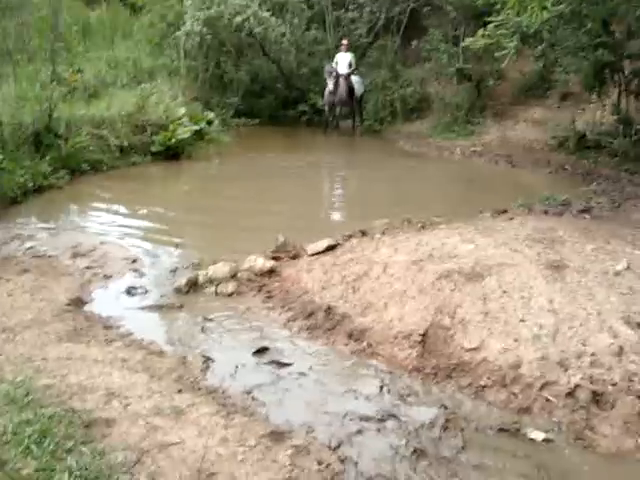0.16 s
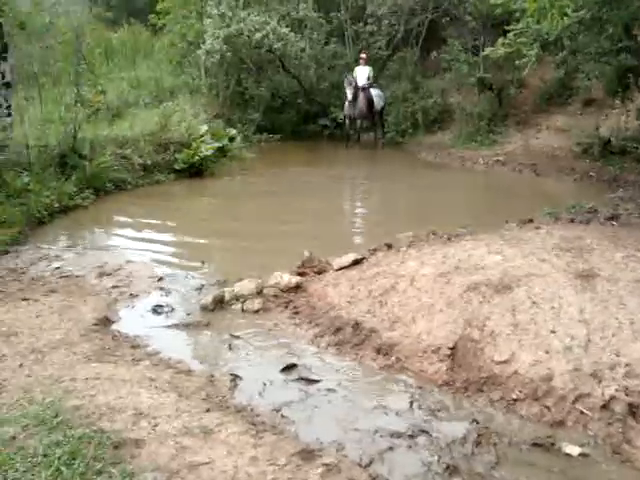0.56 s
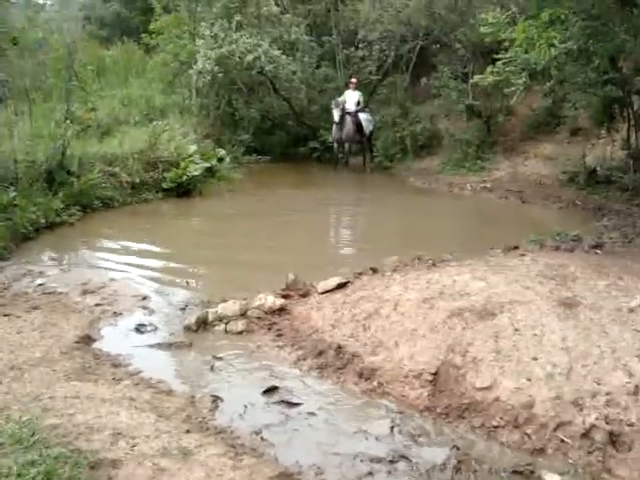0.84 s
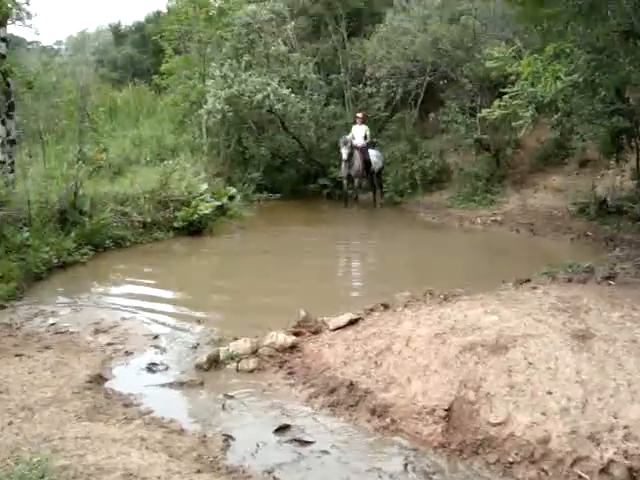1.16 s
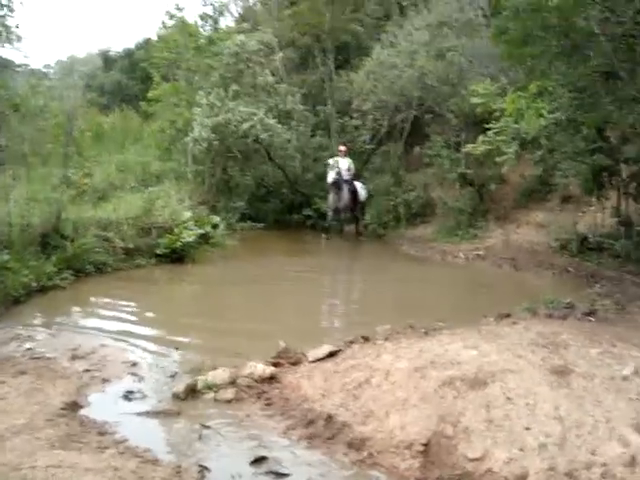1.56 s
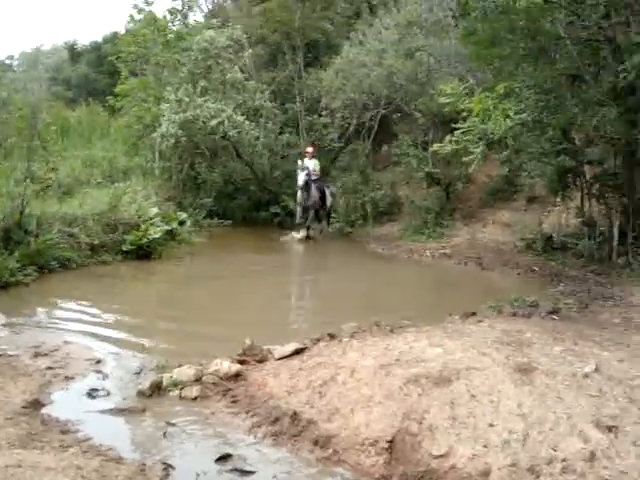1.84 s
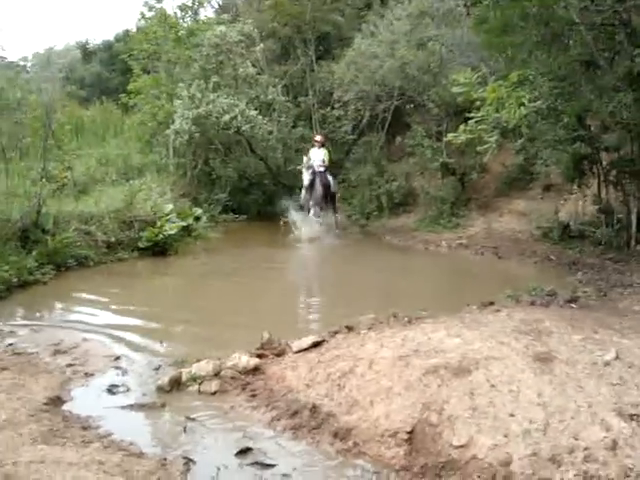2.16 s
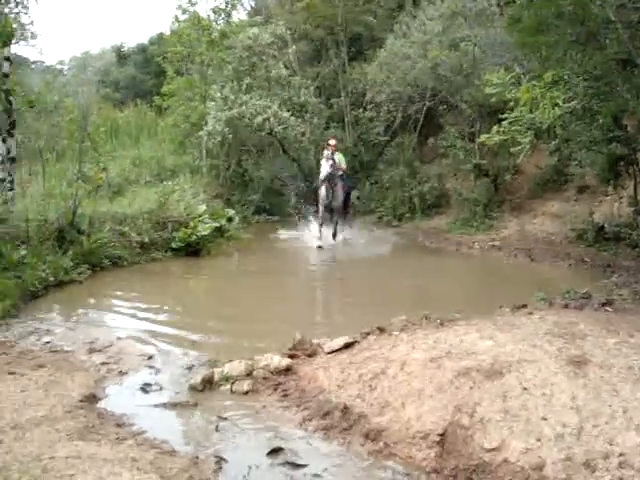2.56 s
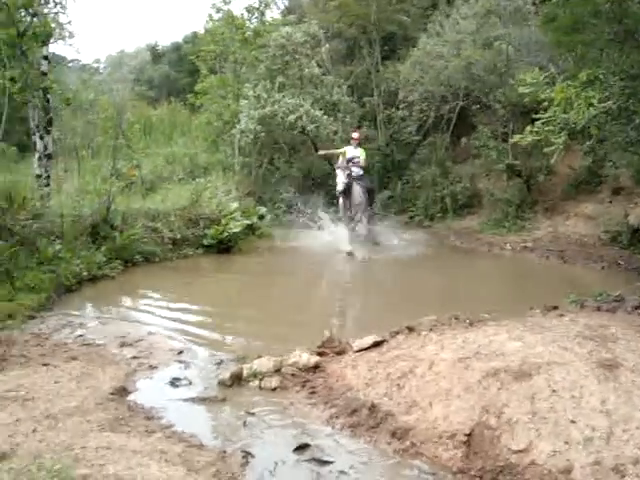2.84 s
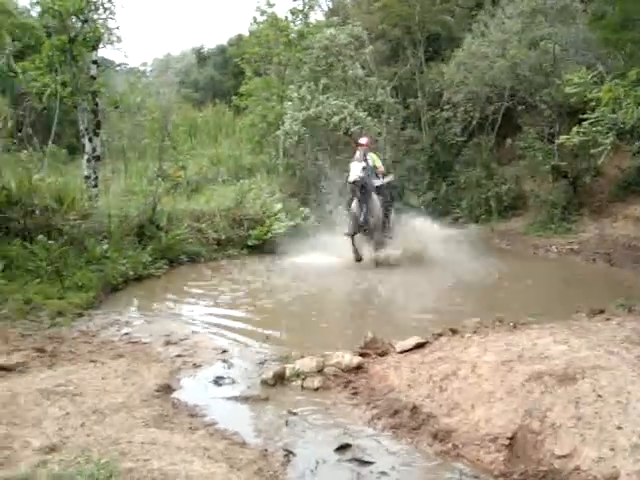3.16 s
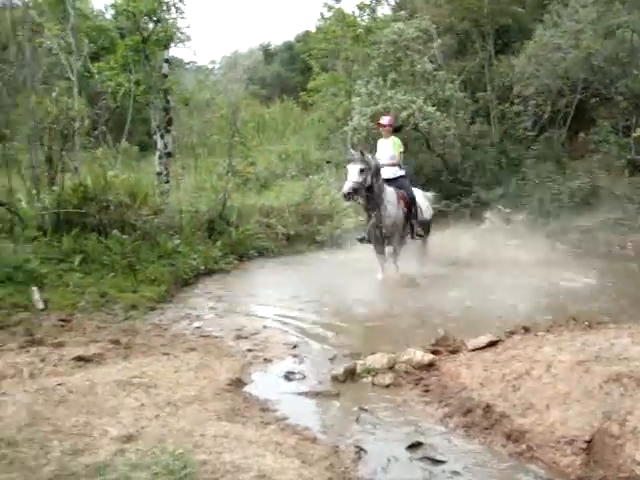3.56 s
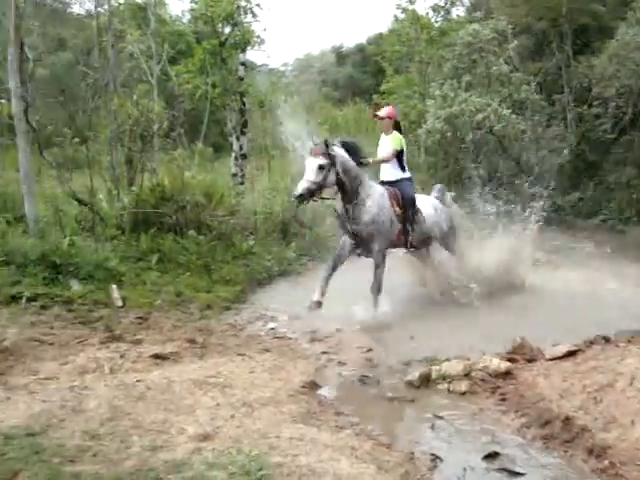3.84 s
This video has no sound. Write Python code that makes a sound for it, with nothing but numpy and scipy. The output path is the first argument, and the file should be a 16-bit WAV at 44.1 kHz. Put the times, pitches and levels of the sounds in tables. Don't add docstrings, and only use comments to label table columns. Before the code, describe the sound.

Hooves plunge and crack into shallow water, growing nearer, after a quiet moment of thin insect song

```python
import sys
import numpy as np
from scipy import signal
from scipy.io import wavfile
from scipy.ndimage import uniform_filter1d

SR = 44100
rng = np.random.default_rng(int(sys.argv[2]) if len(sys.argv) > 2 else 0)


def master(y):
    cut = np.clip(np.atleast_2d(y).T, -1, 1)
    pcm = np.round(cut * 32767)
    wavfile.write(sys.argv[1], SR, pcm.astype(np.int16))


def boost_factor(decibels):
    exponent = np.asarray(decibels, float) / 20
    return 10 ** exponent


N = 176400
TIME_S = np.arange(N) / SR
BINS_HZ = np.fft.rfftfreq(4096, 1 / SR)


def evened(x):
    return x / np.sqrt(np.mean(x ** 2) + 1e-20)


def read(points, hz):
    f, value = np.transpose(points)
    return np.interp(np.log(hz + 1), np.log(f + 1), value)


def add(mix, s, sound):
    part = mix[round(s * SR):][:len(sound)]
    part += sound[:len(part)]


def slow(rate_hz):
    t = np.arange(0, N + 256, 256) / SR
    wave = 0
    for f in np.geomspace(rate_hz / 20, rate_hz, 20):
        wave = wave + np.sin(2 * np.pi * (f * t + rng.random())) / np.sqrt(f)
    return np.interp(TIME_S, t, evened(wave))


def coloured(x, db):
    full = np.log(boost_factor(np.concatenate([db, db[-2:0:-1]])))
    taps = np.fft.ifft(np.exp(full - 1j * signal.hilbert(full).imag)).real[:2048]
    return signal.oaconvolve(x, taps)[:len(x)]


def water_db(hz):
    # f/Hz, level/dB
    low_colour = [(25, -53), (110, -15.5), (220, 1), (380, -1.5), (575, 4), (750, -3), (1000, 2.5),
                  (1250, 0)]
    high_colour = [(1700, -2.5), (2290, -6), (3100, -1.5), (3600, -2.5), (5500, -9.5), (9400, -15),
                   (10000, -18)]
    return read(low_colour + high_colour, hz)


def stir(hz, t):
    # t/s, level/dB
    spray = [(1.4, -56), (1.68, -49.5), (1.84, -44.5), (1.87, -36.5), (2.1, -35), (2.5, -33), (2.75, -31.5),
             (3.05, -28), (3.3, -28), (3.46, -27), (3.6, -23), (3.85, -29.5), (4.0, -23.5)]
    # t/s, level/dB, f/Hz, length/s
    plunges = [(1.523, -22.5, 780, 0.021), (1.687, -23.5, 950, 0.079), (1.722, -21, 900, 0.047),
               (1.76, -20.5, 480, 0.012), (1.853, -20, 1210, 0.048), (1.903, -13.5, 1460, 0.014),
               (1.933, -4, 6200, 0.036), (2.044, -16.5, 1100, 0.16), (2.174, -18, 1080, 0.065),
               (2.279, -12.5, 1160, 0.089), (2.334, -9, 790, 0.028), (2.524, -9, 550, 0.02),
               (2.582, -5.5, 1120, 0.044), (2.71, -5, 683, 0.022), (2.812, -8, 1230, 0.032),
               (2.91, -13, 610, 0.025), (2.945, -10.5, 1120, 0.083), (3.017, -15, 1100, 0.036),
               (3.1, -1.5, 970, 0.041), (3.16, -4.5, 1170, 0.027), (3.207, -2.5, 1150, 0.014),
               (3.219, -4, 406, 0.028), (3.36, -15, 1080, 0.018), (3.398, -8.5, 493, 0.037),
               (3.485, 1.5, 690, 0.0086), (3.502, 0, 1040, 0.021), (3.605, -0.5, 1630, 0.029),
               (3.625, -5.5, 700, 0.12), (3.691, -0.5, 900, 0.019), (3.888, 0, 1070, 0.0085),
               (3.948, -4, 1100, 0.065)]
    # t/s, level/dB, length/s
    fizzes = [(1.85, -28.5, 0.014), (1.934, -16.5, 0.015), (2.034, -29, 0.098), (2.333, -27.5, 0.14),
              (2.53, -21.5, 0.097), (2.676, -9.5, 0.014), (2.71, -23, 0.077), (2.809, -17, 0.0055),
              (2.816, -17, 0.012), (2.908, -24.5, 0.03), (3.04, -24.5, 0.13), (3.096, -17.5, 0.26),
              (3.171, -18.5, 0.033), (3.205, -16.5, 0.02), (3.255, -12.5, 0.0068), (3.346, -17, 0.0049),
              (3.509, -12.5, 0.05), (3.625, -16, 0.27), (3.644, -19, 0.037), (3.678, -14.5, 0.11),
              (3.876, -17, 0.066)]
    plunge_db, plunge_octaves, plunge_rise_s = -15, 0.74, 0.0016
    fizz_db, fizz_hz, fizz_octaves, fizz_rise_s = -3, 2330, 0.86, 0.00038

    spray_db = np.interp(t, *np.transpose(spray), left=-99)
    bass_share = 1 / (1 + (hz / 253) ** 2)
    power = boost_factor(spray_db + np.outer(bass_share, spray_db - spray[-1][1])) ** 2
    for s, db, pitch_hz, length in plunges:
        u = np.maximum(t - s, 0)
        band = np.exp(-(np.log2(hz / pitch_hz) / plunge_octaves) ** 2)
        swell = (1 - np.exp(-u / plunge_rise_s)) * np.exp(-u / length)
        power = power + boost_factor(2 * (db + plunge_db)) * np.outer(band, swell)
    high = 1 / (1 + np.exp(-np.log2(hz / fizz_hz) / fizz_octaves))
    for s, db, length in fizzes:
        u = np.maximum(t - s, 0)
        swell = (1 - np.exp(-u / fizz_rise_s)) * np.exp(-u / length)
        power = power + boost_factor(2 * (db + fizz_db)) * np.outer(high, swell)
    return power


def water():
    drops_per_s, spread_db = 8000, 3.2
    cycles, glide = 4.9, .05
    wash = 0.47
    pitches_hz, t = np.geomspace(40, 11000, num=40), np.arange(0, N + 64, 64) / SR
    share = pitches_hz / pitches_hz.sum()
    gain = np.sqrt(stir(pitches_hz, t))
    out = np.zeros(N)
    for hz, part, level in zip(pitches_hz, share, gain):
        chance = (drops_per_s * part + 40) / SR
        sizes = boost_factor(spread_db * np.minimum(rng.exponential(1, N), 5))
        drops = sizes * (rng.random(N) < chance)
        drive = np.sqrt(1 - wash) * evened(drops) + np.sqrt(wash) * rng.standard_normal(N)
        drive = drive * np.interp(TIME_S, t, level)
        u = np.arange(0, 3 * cycles, hz / SR)
        bubble = u * np.exp(-2 * u / cycles) * np.sin(2 * np.pi * u * (1 + glide * u / cycles))
        bubble = bubble / np.linalg.norm(bubble)
        out += signal.oaconvolve(drive, bubble)[:N] * np.sqrt(part)
    db = water_db(BINS_HZ)
    return coloured(out, db) / np.sqrt(2 * np.mean(boost_factor(2 * db)))


def slaps():
    # t/s, peak level/dB, length/s, f/Hz
    cracks = [(1.517, -37, .002, 950), (1.904, -25, .002, 1600), (1.9333, -8, .004, 4500),
              (2.677, -6, .004, 3200), (2.704, -16, .002, 3300), (2.8017, -6, .0012, 4000),
              (2.833, -12, .002, 3000), (3.028, -15, .002, 3300), (3.118, -13, .003, 1050),
              (3.2135, -11, .003, 3080), (3.2592, -9, .0013, 3400), (3.342, -13, .006, 1400),
              (3.5022, -3.5, .004, 3400), (3.621, -6, .003, 2100), (3.644, -12, .002, 1900),
              (2.0222, -22, .003, 3130), (2.4602, -23, .002, 3500), (2.9007, -18, .002, 3660),
              (3.3477, -13, .002, 3030), (3.4838, -14, .002, 3360), (3.829, -12, .0012, 3800),
              (3.8905, -7.5, .004, 2800)]
    # t/s, level/dB, length/s
    thuds = [
        (1.9345, -24, .0005),
        (2.679, -38, .001),
        (3.262, -39, .0013),
        (3.504, -35, .0013),
        (3.625, -40, .0015),
        (3.68, -39, .002),
        (3.892, -44, .004),
    ]
    snap_db, tilt_db_per_octave = 4, 1
    peak_db, peak_octaves, blur_s = 17, .4, .004
    out, t = np.zeros(N), np.arange(0, .04, 1 / SR)
    colour_db = water_db(BINS_HZ) + tilt_db_per_octave * np.log2(BINS_HZ / 1000 + 0.11)
    for s, db, length, hz in cracks:
        snaps = rng.standard_normal(len(t)) * boost_factor(snap_db * np.minimum(rng.exponential(1, len(t)), 3))
        snaps = np.where(t == 0, 2 * snaps.std(), snaps) * np.exp(-t / length)
        peak = 1 / (1 + (np.log2(BINS_HZ / hz + 1e-3) / peak_octaves) ** 2)
        snaps = coloured(snaps, colour_db + peak_db * np.exp(-length / blur_s) * peak)
        add(out, s, boost_factor(db) * snaps / abs(snaps).max())
    for s, db, length in thuds:
        u = t / length
        add(out, s, boost_factor(db) * 2 * np.e * u * (1 - u / 2) * np.exp(-u))
    return out


def bubbles():
    # t/s, level/dB, f/Hz
    loud_bubbles = [(1.52, -40.5, 960), (1.711, -44, 1130), (1.722, -43, 545), (1.734, -41, 940),
                    (1.766, -45, 900), (1.778, -39, 467), (1.788, -39.5, 526), (1.808, -45, 1100),
                    (1.887, -35, 1210), (1.907, -35, 1530), (1.935, -27, 1740), (1.937, -29, 590),
                    (2.293, -35, 1310), (2.308, -35, 990), (2.336, -32, 520), (2.546, -34.5, 606),
                    (2.598, -24.5, 997), (2.61, -22, 1110), (2.622, -30, 1150), (2.685, -30, 920),
                    (2.697, -34, 1130), (2.815, -27, 1150), (2.826, -27.5, 1150), (3.131, -16, 1096),
                    (3.165, -23, 1200), (3.217, -19.5, 980), (3.252, -26.5, 492), (3.345, -28, 945),
                    (3.506, -18.5, 1020), (3.515, -22.5, 640), (3.529, -19.5, 1205), (3.55, -19.5, 980),
                    (3.623, -14, 1770), (3.642, -21.5, 580), (3.644, -20, 1220), (3.694, -21, 940),
                    (3.744, -21.5, 558), (3.892, -26, 590), (3.902, -15.5, 1086), (3.955, -22, 568),
                    (3.964, -19.5, 1210)]
    out, t = np.zeros(N), np.arange(0, .05, 1 / SR)
    for (s, db, hz), phase in zip(loud_bubbles, rng.random(len(loud_bubbles))):
        ring_s = 0.002814 * np.sqrt(1000 / hz)
        u = t / ring_s
        turns = np.cumsum(hz * (1 + 0.019 * (u - 1.5))) / SR + phase
        ring = u * np.exp(1 - u) * np.sin(2 * np.pi * turns)
        add(out, s - 1.514 * ring_s, boost_factor(db + 1.5) * ring)
    return out


def gulps():
    # t/s, level/dB, f/Hz
    pockets = [
        (3.126, -26.5, 223.4),
        (3.224, -23.5, 305),
        (3.264, -27.5, 190),
        (3.415, -31.5, 182),
        (3.672, -24, 200),
        (3.738, -24, 168.6),
        (3.781, -27, 153),
    ]
    swell_s, glide, wobble_depth = .008, .04, .1
    out, t = np.zeros(N), np.arange(0, .1, 1 / SR)
    u = t / swell_s
    for s, db, hz in pockets:
        wobble = wobble_depth * evened(uniform_filter1d(rng.standard_normal(len(t)), size=200))
        turns = np.cumsum(hz * (1 + glide * (u - 1) + wobble)) / SR
        add(out, s, boost_factor(db - 4.5) * 2 * u ** 2 * np.exp(-u) * np.sin(2 * np.pi * turns))
    return out


def ticks():
    # t/s, level/dB, f/Hz, t60/s
    clicks = [(0.0618, -10, 3850, 0.007), (0.06257, -13, 3850, 0.004), (0.062, -25, 1750, .008),
              (0.0591, -29, 3400, .012), (0.0655, -33, 4200, .012), (0.3706, -34, 2970, 0.0034),
              (1.0738, -37, 1200, 0.009), (1.0863, -31, 3750, 0.008), (1.0866, -35, 1600, 0.01),
              (1.0883, -29, 2200, 0.007), (1.0905, -36, 900, .02), (1.1075, -41, 1700, .008)]
    out, t = np.zeros(N), np.arange(0, .03, 1 / SR)
    for s, db, hz, t60 in clicks:
        ring = np.sin(2 * np.pi * hz * t)
        ring += 0.25 * np.sin(2 * np.pi * 0.31 * hz * t)
        ring += 0.22 * np.sin(2 * np.pi * 1.15 * hz * t)
        ring += 0.14 * rng.standard_normal(len(t)) * np.exp(-t / 0.0021)
        add(out, s, boost_factor(db - 60 * t / t60) * np.minimum(t / 0.00013, 1) * ring)
    return out - uniform_filter1d(out, size=150)


def cricket():
    # t/s, level/dB
    song = [
        (.1, -70),
        (.25, -65),
        (.45, -70),
        (.6, -65),
        (.9, -64),
        (1.0, -58),
        (1.12, -62),
        (1.3, -67),
        (1.85, -70),
    ]
    level_db = np.interp(TIME_S, *np.transpose(song), right=-75)
    early = np.clip((.95 - TIME_S) / 0.24, 0, 1)
    hz = 4580 + 12 * slow(23) - 70 * early
    return boost_factor(level_db + 2.5 + 2.5 * slow(40)) * np.sin(2 * np.pi * np.cumsum(hz) / SR)


def wood():
    # f/Hz, level/dB
    air_colour = [(25, -18), (120, -9.5), (260, -3), (470, -1.5), (1100, -5), (2280, -11.5), (6370, -17.5),
                  (10000, -24)]
    # f/Hz, width/Hz, level/dB, throb/dB
    choirs = [
        (4350, 550, -57, 0),
        (6420, 580, -58, -1.5),
        (8200, 1300, -66, 3),
        (295.3, 26, -61, 1.5),
        (200, 23, -70.5, 2.5),
    ]
    # t/s, gain/dB
    passing = [
        (.3, 4),
        (.6, -2),
        (.88, -6),
        (.97, 7),
        (1.08, -8),
        (1.45, -5),
        (1.6, -2),
        (1.72, 7),
    ]
    frames = N // 128 + 5
    a, b, patches = rng.standard_normal((frames, 257, 3)).T
    patches = uniform_filter1d(patches, size=6, axis=0)
    patches = evened(uniform_filter1d(patches, size=16, axis=1))
    flat = signal.istft((a + 1j * b) * boost_factor(1.6 * patches), nperseg=512, noverlap=384)[1][:N]
    out = boost_factor(-52 + 0.75 * slow(12.8)) * evened(coloured(flat, read(air_colour, BINS_HZ)))
    hum_db = np.interp(TIME_S, *np.transpose(passing))
    for hz, width_hz, db, throb_db in choirs:
        r = np.exp(-np.pi * width_hz / SR)
        base = rng.standard_normal(N) + 1j * rng.standard_normal(N)
        base = signal.lfilter([1], np.convolve([1, -r], [1, -r]), base)
        voice = evened((base * np.exp(2j * np.pi * hz * TIME_S)).real)
        out += boost_factor(db + hum_db * (hz < 400) + throb_db * slow(25.73)) * voice
    return out


def scene():
    mono = water() + slaps() + bubbles() + gulps() + ticks() + cricket() + wood()
    return np.tile(mono, (2, 1))


def starved(x):
    # t/s, length/s, from f/Hz, to f/Hz
    dropouts = [
        (1.054, .018, 3100, 3900),
        (1.115, .008, 2300, 3900),
        (1.056, .026, 5000, 5900),
        (1.056, .026, 7100, 7900),
        (1.917, .013, 3200, 11000),
        (2.688, .014, 5200, 6500),
        (2.784, .013, 2800, 4300),
        (3.862, .026, 5700, 6800),
    ]
    hz, t, z = signal.stft(x, SR, nperseg=256, noverlap=192)
    cells = rng.random((len(hz) // 4 + 1, len(t) // 6 + 1)) < .04
    gone = cells[np.arange(len(hz)) // 4][:, np.arange(len(t)) // 6]
    gone = gone & (hz[:, None] > 4800)
    for s, length, lo_hz, hi_hz in dropouts:
        gone = gone | np.outer((hz > lo_hz) & (hz < hi_hz), (t > s) & (t < s + length))
    return signal.istft(z * np.where(gone, .03, 1), SR, nperseg=256, noverlap=192)[1][:N]


def roll_off(x):
    return signal.sosfilt(signal.butter(12, 10920, fs=SR, output="sos"), x)


def record(dry):
    x = starved(dry[0])
    bass = signal.oaconvolve(x, signal.firwin(511, 1900, window="blackman", fs=SR), "same")
    treble_open = np.clip((TIME_S - .079) / 0.0099, 0, 1)
    tick_through = np.exp(-((TIME_S - .0625) / 0.0046) ** 2)
    x = bass + np.maximum(treble_open, tick_through) * (x - bass)
    x = x * np.clip((TIME_S - .042) / 0.0031, 0, 1)
    x = signal.oaconvolve(x, signal.firwin(511, 10150, window=("kaiser", 9), fs=SR), "same")
    return roll_off(np.array([x, x]))


dry = scene()
out = record(dry)
master(out)
```